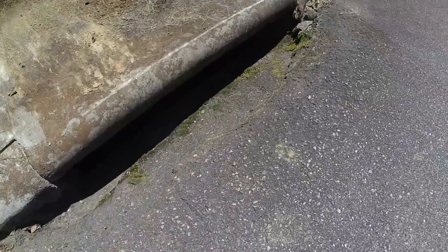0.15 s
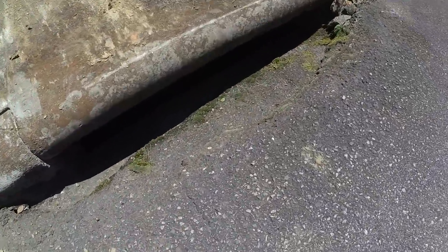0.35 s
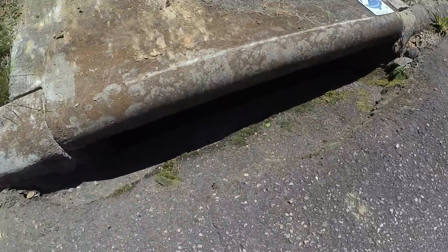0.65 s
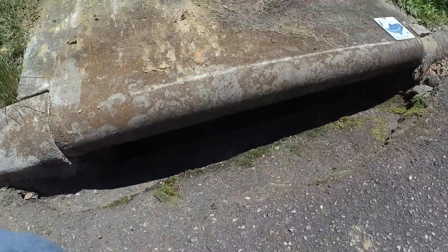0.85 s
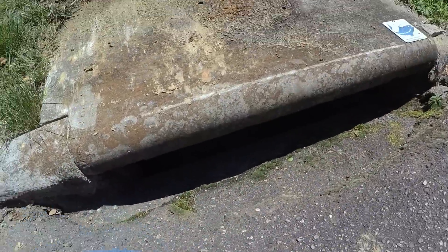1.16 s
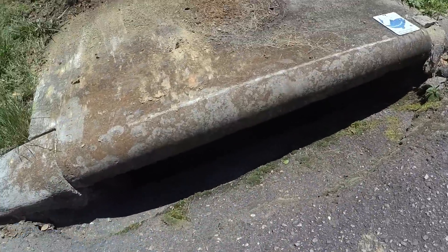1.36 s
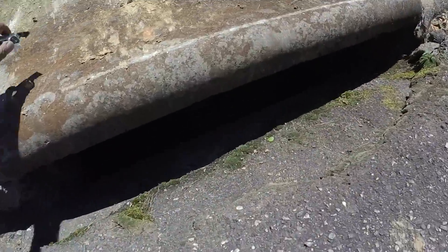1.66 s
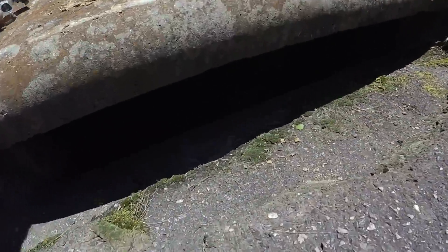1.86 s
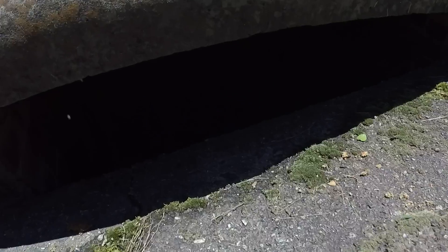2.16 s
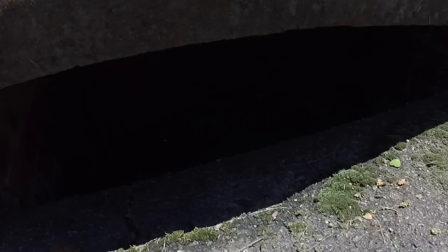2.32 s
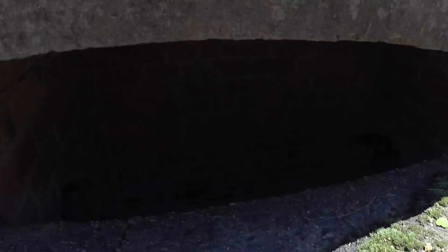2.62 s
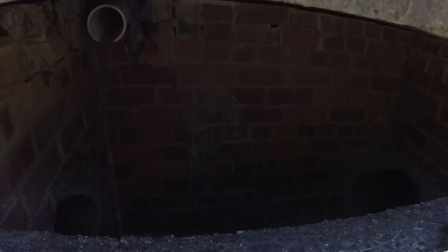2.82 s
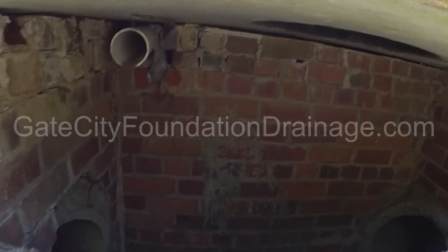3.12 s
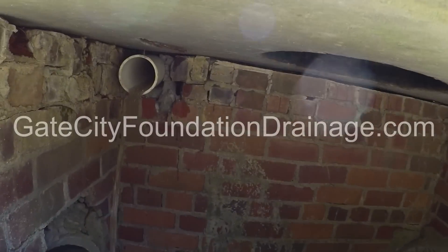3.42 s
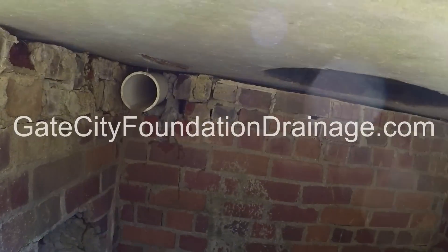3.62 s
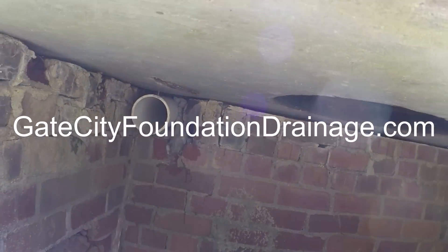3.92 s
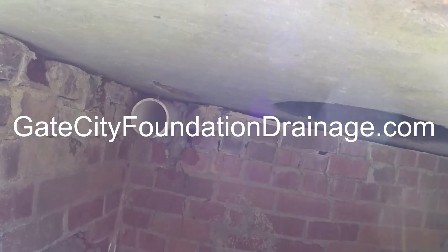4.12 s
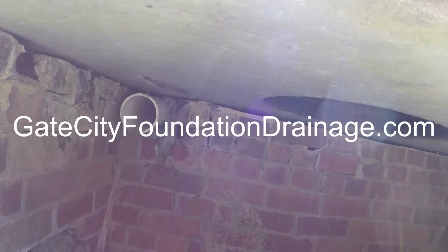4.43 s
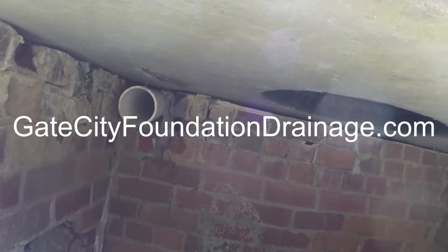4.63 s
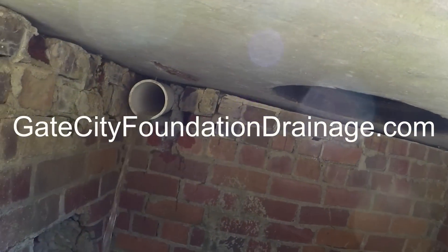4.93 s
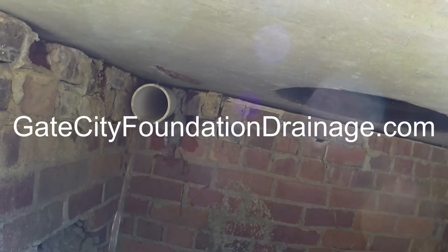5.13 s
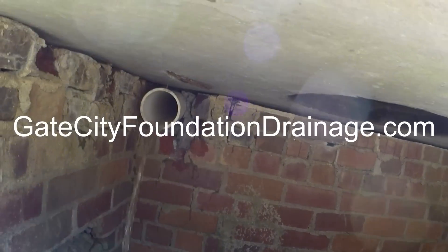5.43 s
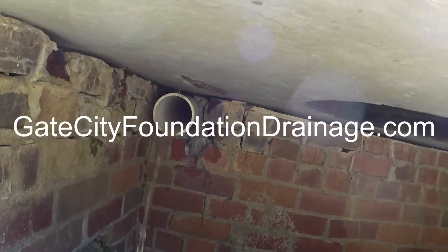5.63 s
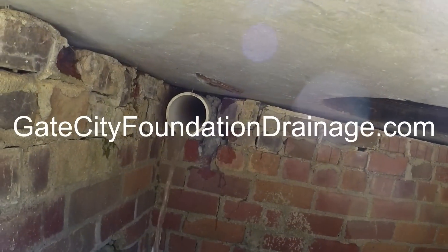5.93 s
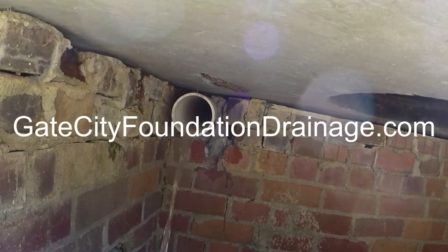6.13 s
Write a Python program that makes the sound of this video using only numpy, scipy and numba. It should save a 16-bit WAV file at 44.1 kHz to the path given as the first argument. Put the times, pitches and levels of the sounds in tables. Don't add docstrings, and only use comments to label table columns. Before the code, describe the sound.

From 0 to 2 seconds, a low, wavering street rumble lies beneath a soft, distant splatter of water, blurred by a slot at the kerb. A hard little click of the housing sounds at 0.2 s. Between about 1.2 and 2 s, fingers rub and bump the device with dull thuds and tiny scratches. At 2.05 s a bright double clack strikes concrete, followed by a small tap at 2.2 s. At once the water is nearer and fuller, ringing shortly between brick walls. A thin stream crackles irregularly on the floor, with sharp wet snaps, duller slaps, plops and brief bubbling gurgles over a steady hiss. The rumble recedes. From 3.5 s, fine misty spray brightens the sound and a faint low machine hum rises, strongest near 5.6 s. Especially strong splashes burst at 5.36 and 6.04 s, and the water continues to the end at 6.3 s.

```python
import sys
import numpy as np
from scipy import signal
from scipy.fft import rfft, irfft
from scipy.io import wavfile
from scipy.ndimage import uniform_filter1d
from numba import njit

SR = 44100
rng = np.random.default_rng(int(sys.argv[2]) if len(sys.argv) > 2 else 0)


def persist_wave(psi):
    counts = np.round(np.clip(psi, -1, 1) * 32767).astype(np.int16)
    wavfile.write(sys.argv[1], SR, np.atleast_2d(counts).T)


def nominal_scale(level):
    x = np.asarray(level, float) / 20
    return 10 ** x


N = 276507

SLOT_S, CROSSING_S, TURN_S = 2.04, 0.47, 9.6

# freq_hz, level_db (per Hz)
STREET_TONE = [(15, -42), (25, 3), (224, 3), (332, -3), (368, -4.5), (468, -7), (659, -10), (961, -9),
               (1050, -14), (1500, -13), (1950, -46), (3300, -120)]
# time_s, level_db
STREET_LEVEL = [(0.0, -50.5), (1.29, -48.5), (2.0, -49), (3.53, -54), (5.92, -52), (6.27, -55)]
# time_s, level_db
HUM_LEVEL = [
    (0, -89),
    (3.5, -56),
    (4.6, -52),
    (5.6, -46),
    (6.27, -48),
]
# freq_hz, width_hz, level_db
HUM_TONES = [(149, 5.6, -9.5), (228, 12.5, -8.5), (311.5, 8.7, -12), (373.6, 15, -7)]
# middle_s, peak_db, pitch_hz, half_length_s
HAND_THUMPS = [(0.55, -40.5, 346, 0.0077), (1.217, -40, 241, 0.0026), (1.287, -39, 108, 0.015),
               (1.306, -44, 342, 0.0034), (1.334, -33, 120, 0.0048), (1.338, -30, 318, 0.008),
               (1.347, -31, 590, 0.0032), (1.381, -36, 360, 0.0034), (1.393, -38, 300, 0.0052),
               (1.412, -37, 500, 0.0058), (1.486, -30, 87.5, 0.0047), (1.531, -35, 104, 0.015),
               (1.572, -21, 333, 0.0019), (1.862, -26.5, 174, 0.0056), (1.878, -29.5, 94.5, 0.0078),
               (1.946, -21, 164, 0.0047), (1.981, -35, 148, 0.0051), (2.781, -41, 60.4, 0.014),
               (5.952, -33, 85.5, 0.0082)]
# start_s, peak_db, centre_hz, length_s
HOUSING_RUBS = [(1.247, -30, 2400, 0.031), (1.277, -30, 2400, 0.03), (1.296, -41, 452, 0.015),
                (1.298, -31.5, 2500, 0.02), (1.314, -37, 2620, 0.012), (1.333, -39, 500, 0.0078),
                (1.366, -47, 500, 0.012), (1.391, -43, 460, 0.011), (1.402, -43, 520, 0.01),
                (1.567, -43, 560, .02), (1.651, -37.5, 630, 0.012), (2.049, -18, 3830, 0.015),
                (2.412, -44, 647, 0.017), (3.908, -40.5, 474, 0.078)]
# start_s, peak_db, pitch_hz, decay_cycles
BODY_KNOCKS = [(0.2144, -21, 4530, 3.9), (0.218, -11.5, 4100, 2.2), (0.2243, -10, 2800, 0.58),
               (0.2275, -16, 3130, 1.6), (1.464, -29, 847, 0.33), (2.0522, -13, 1170, 4.8),
               (2.053, -12, 2090, 3.7), (2.0536, -13, 5600, 5.5), (2.0724, -1.5, 4040, 0.59),
               (2.073, -5, 4760, 3.5), (2.0732, -8, 2540, 4.4), (2.0742, -4.5, 6330, 8.3),
               (2.075, -10.5, 3830, 7.3), (2.076, -16.5, 1634, 13), (2.189, -23.5, 1715, 6.1),
               (2.1891, -25, 1320, 4.6)]
# middle_s, peak_db, pitch_hz, half_length_s
SHARP_TICKS = [(0.2248, -32, 330, 0.0021), (0.225, -21.5, 960, 0.0014), (0.2258, -26, 2500, 0.00035),
               (0.2293, -22, 3600, .0003), (1.2538, -24, 2900, 0.00094), (1.296, -25, 2500, .0004),
               (1.33, -34, 2400, .0005), (1.344, -31, 600, .001), (1.392, -35, 480, .0012),
               (1.4645, -37, 900, 0.00058), (1.6355, -26, 3250, .0006), (1.9225, -25, 6000, 0.00054),
               (2.0535, -26, 750, 0.0013), (2.0729, -6, 3200, 0.00014), (2.0737, -12, 5370, .0004),
               (2.0838, -14, 3800, .0005), (2.187, -22, 2700, 0.00075), (2.1886, -18.5, 1520, .0011),
               (2.499, -21, 5650, 0.00045), (2.6827, -7, 5660, 0.00019), (2.6862, -11, 4450, 0.00025),
               (2.7705, -19, 6000, 0.00044), (3.1062, -18, 5670, .0006), (3.1255, -14, 5400, 0.00054),
               (3.8745, -21, 4500, .0004), (5.361, -13, 6200, .0005), (6.0645, -13, 2950, .001)]
# start_s, peak_db, centre_hz
STREET_SLUGS = [(0.042, -14.5, 6260), (0.139, -30, 4040), (0.205, -17.5, 4540), (0.247, -20, 6170),
                (0.32, -23.5, 2980), (0.388, -16.5, 6500), (0.454, -18, 2950), (0.518, -16.5, 5500),
                (0.575, -17, 4600), (0.638, -24.5, 2880), (0.685, -17, 4800), (0.84, -21, 5930),
                (0.932, -29, 5600), (1.116, -20, 3100), (1.164, -18.5, 3740), (1.2526, -24, 2880),
                (1.541, -18, 4930), (1.6347, -34, 3200), (1.7275, -27, 3260), (1.763, -22, 4100),
                (1.9215, -11, 6200), (2.03, -10, 6640)]
# start_s, peak_db, centre_hz
SMALL_STREET_SLUGS = [(0.2813, -30, 2980), (0.5641, -20, 3950), (0.8784, -23, 4400), (1.0146, -22, 5930),
                      (1.0844, -28, 5190), (1.413, -34, 3030), (1.4834, -28, 5110), (1.588, -25, 4840),
                      (1.8284, -26, 6450), (1.8634, -23, 2990)]
# start_s, peak_db, centre_hz
BIG_SLUGS = [(2.271, -8.5, 5630), (2.497, -8, 5700), (2.683, -5.5, 4870), (2.7674, -2, 6000),
             (2.787, -8, 4500), (2.907, -7.5, 4840), (3.0585, -6, 5770), (3.123, -6, 5200),
             (3.135, -10, 4970), (3.259, -12, 5000), (3.28, -8, 5600), (3.31, -10.5, 5300),
             (3.417, -9, 5470), (3.582, -7, 6700), (3.707, -11, 6860), (3.815, -19, 5660),
             (3.873, -4.5, 5600), (4.036, -9.5, 5600), (4.277, -7.5, 5530), (4.357, -2, 6300),
             (4.379, -10, 5150), (4.456, -8.5, 5050), (4.681, -5.5, 6100), (4.858, -7, 5970),
             (4.942, -4, 6100), (5.108, -6.5, 6100), (5.29, -6, 6100), (5.327, -4, 6350),
             (5.358, 1.5, 6100), (5.67, -2, 6100), (5.693, -9, 6800), (5.789, -14, 4900), (6.0396, 6, 6670)]
# start_s, peak_db, centre_hz
LESSER_SLUGS = [(2.1104, -14.5, 4590), (2.1854, -23, 5880), (2.2234, -20, 4640), (2.4069, -14, 5400),
                (2.4483, -11, 6240), (2.4813, -15, 5700), (2.5795, -13.5, 5260), (2.61, -14, 6830),
                (2.6424, -21, 4500), (2.7504, -16, 5990), (2.837, -9.5, 5730), (2.8838, -16, 5290),
                (2.9791, -10, 5620), (3.0214, -13, 5270), (3.1053, -13, 5680), (3.1914, -11, 4910),
                (3.2291, -26, 5170), (3.3837, -19, 5250), (3.5528, -11, 6200), (3.6064, -16, 6340),
                (3.6326, -15, 5260), (3.6526, -17, 6200), (3.6955, -20, 5460), (3.9689, -18, 5600),
                (4.1255, -19, 5640), (4.144, -21, 5100), (4.1654, -16, 6150), (4.2128, -12, 5800),
                (4.3424, -19, 5950), (4.4413, -14, 4940), (4.5351, -15, 6300), (4.5674, -18, 6180),
                (4.6129, -15, 4560), (4.7456, -17, 6490), (4.8963, -16, 6330), (4.9247, -11, 6200),
                (4.9821, -12, 5100), (5.0304, -12, 6230), (5.0853, -17, 4970), (5.1464, -19, 6500),
                (5.2465, -15, 5860), (5.4234, -13, 6380), (5.4575, -10, 6200), (5.5343, -12, 5870),
                (5.5702, -11, 5800), (5.6294, -26, 6100), (5.7404, -21, 6440), (5.8544, -31, 6000),
                (5.895, -27, 6400), (5.9334, -24, 6200), (6.0003, -24, 6040), (6.2442, -13, 6680)]
# start_s, peak_db, centre_hz
BRICK_SLAPS = [(2.184, -27, 2700), (2.216, -17, 2900), (2.375, -19, 2880), (2.45, -20.5, 2700),
               (2.494, -23, 3370), (2.608, -17, 2630), (2.679, -16, 3000), (2.769, -15, 2700),
               (2.786, -9.5, 3800), (2.975, -15.5, 3140), (3.131, -12.5, 3340), (3.1565, -12, 3100),
               (3.222, -15, 3570), (3.421, -17, 3620), (3.6865, -13, 3640), (3.8116, -15.5, 3740),
               (3.8705, -18, 2600), (4.01, -16.5, 3400), (4.2, -19, 3100), (4.373, -17.5, 3250),
               (4.497, -16, 3000), (4.855, -16, 3080), (4.951, -22, 2390), (5.079, -17, 3770),
               (5.397, -17, 3750), (5.6867, -20, 2390), (5.7919, -17, 3100), (5.9665, -19.5, 2830),
               (6.021, -19, 2640), (6.0613, -12.5, 3040)]
# start_s, peak_db, centre_hz
LESSER_SLAPS = [(2.1162, -20, 2700), (2.347, -29, 3560), (2.6667, -19.5, 2990), (2.906, -30, 3970),
                (2.9352, -14.5, 4000), (3.2565, -21, 3630), (3.2959, -21, 3260), (3.3797, -23, 2960),
                (3.513, -29, 3450), (3.63, -25, 2390), (3.7515, -23, 3700), (4.0851, -37, 3540),
                (4.797, -19, 3850), (4.9267, -26, 3740), (5.1507, -20, 3680), (5.2874, -29, 3200),
                (5.3457, -22, 3720), (5.4645, -19.5, 3760), (5.5154, -24, 3980), (5.5363, -24, 3980),
                (5.6605, -30, 2420), (5.9348, -32, 2920), (6.1489, -22, 3750)]
# start_s, peak_db, centre_hz
FLOOR_PLOPS = [(0.183, -35, 900), (2.014, -30, 1430), (2.219, -39, 1680), (2.417, -34.5, 870),
               (2.605, -44, 1760), (2.735, -34, 1530), (2.784, -25, 1850), (3.124, -27, 1750),
               (3.165, -25, 1510), (3.521, -25.5, 1040), (3.633, -28.5, 1060), (3.704, -25, 1780),
               (3.75, -29.5, 1270), (3.813, -27.5, 1360), (3.903, -32.5, 723), (4.162, -27.5, 1090),
               (4.374, -30, 1620), (4.455, -37, 650), (4.505, -28, 1360), (4.648, -22, 1245),
               (4.667, -27, 1200), (5.026, -30.5, 1030), (5.318, -27, 1780), (5.466, -26.5, 1590),
               (5.511, -32.5, 617), (5.673, -27, 1550), (5.716, -38, 1780), (6.025, -24.5, 1077),
               (6.053, -25, 1890), (6.241, -31, 1054)]
# start_s, peak_db
MIST_BURSTS = [(2.6092, -31), (3.3435, -37), (3.529, -24), (3.585, -25), (3.6524, -23), (3.7087, -24),
               (3.815, -23), (3.8714, -28), (3.9087, -20.5), (4.0369, -23), (4.3557, -22), (4.537, -23),
               (4.5717, -28), (4.6131, -28), (4.8596, -36), (4.9227, -27), (5.0824, -24), (5.2164, -29),
               (5.2657, -27), (5.3418, -18), (5.5151, -20), (5.5949, -32), (5.629, -25), (5.6593, -24),
               (5.6943, -19.5), (5.7878, -20.5), (6.041, -23), (6.1036, -23)]
# start_s, peak_db, pitch_hz
PUDDLE_GURGLES = [(2.9, -13, 3080), (3.176, -29, 1290), (3.226, -20, 3600), (3.258, -24, 2400),
                  (4.573, -17, 2440), (5, -20.5, 2460), (4.3, -19, 2300), (4.719, -22, 2330),
                  (4.754, -19.5, 2390), (4.9536, -20, 2390), (5.0714, -26, 2390), (5.469, -27, 1575),
                  (5.685, -24, 2390), (5.69, -30, 1480), (5.719, -26, 1810), (5.2, -33.5, 1500),
                  (5.742, -32, 1600), (5.795, -42, 960), (6.061, -13, 2930), (6.195, -31.5, 1610)]
# time_s, splatter_level_db, air_gap_ring_hz
NEARNESS = [(0.0, -37.5, 5800), (0.54, -36, 5700), (1.38, -37.5, 5350), (1.85, -33.5, 5700),
            (2.02, -33, 5740), (2.12, -27.5, 5730), (2.3, -29.5, 5670), (2.6, -28, 5520),
            (3.12, -26.5, 5300), (3.4, -26.5, 5600), (3.9, -26.5, 5600), (4.4, -25, 5880), (4.9, -26, 5830),
            (5.38, -24.5, 6100), (5.6, -28, 6200), (5.9, -28, 6000), (6.06, -25, 6200), (6.27, -29.5, 6200)]
# freq_hz, level_db (per Hz)
WATER_TONE = [(240, -53.5), (400, -15), (473, -16.5), (543, -11), (662, -11), (954, -17), (1060, -9),
              (1250, -12.5), (1330, -11.5), (1680, -12.5), (2730, -2.5), (4180, -1.5), (6320, 2),
              (13100, -25), (15300, -32)]
# freq_hz, width_hz, level_db
PIPE_RINGS = [(1040, 23, -26), (1360, 18, 0), (1580, 34, 1.5), (1780, 32, 3), (1925, 35, -1.5),
              (2110, 38, -3), (2390, 31, -11), (2530, 29, -18), (2700, 31, -17), (2950, 29, -11),
              (4900, 300, -13), (6200, 530, -40)]


def unit(x):
    return x / np.sqrt(np.mean(x ** 2))


def curves(table):
    s, *columns = np.transpose(table)
    return [np.interp(np.arange(N) / SR, s, c) for c in columns]


def inside(outer, inner, span_s):
    progress = (np.arange(N) / SR - SLOT_S) / span_s + .5
    return outer + (inner - outer) * np.clip(progress, 0, 1)


def db_at(spectrum, hz):
    f, db = np.transpose(spectrum)
    return np.interp(np.log(np.maximum(hz, 1)), np.log(f), db)


def colour(x, spectrum, size=2048):
    gain = nominal_scale(db_at(spectrum, np.arange(size // 2 + 1) * SR / size))
    cep = irfft(np.log(gain))
    cep = np.r_[cep[0], 2 * cep[1:size // 2], np.zeros(size // 2)]
    return signal.fftconvolve(x, irfft(np.exp(rfft(cep))))[:N]


def band(x, hz, width_hz):
    return signal.lfilter(*signal.iirpeak(hz, hz / width_hz, SR), x)


def cut(x, hz, kind):
    return signal.sosfilt(signal.butter(2, hz, kind, fs=SR, output="sos"), x)


def walk(rate_hz):
    k = int(SR / rate_hz)
    steps = np.repeat(rng.standard_normal(N // k + 1), k)
    return 0.81 * uniform_filter1d(uniform_filter1d(steps, k), k)[:N]


@njit
def grains(s, hz, cycles, size, glide, swell):
    out = np.zeros(N)
    for k in range(len(s)):
        i = int(s[k] * SR)
        life = cycles[k] * SR / hz[k]
        z = size[k] + 0j
        p = np.exp(2j * np.pi * hz[k] / SR - 1 / life)
        turn = np.exp(2j * np.pi * hz[k] * glide / life / SR)
        closed, opening = 1., np.exp(-1 / (swell * life + 1e-9))
        for j in range(max(i, 0), min(i + int(5 * life), N)):
            closed *= opening
            out[j] += z.imag * (1 - closed)
            z *= p
            p *= turn
    return out


def splats(s, db, hz, length_s, octaves, cycles, scatter_db, count, blur_s=.002):
    u = rng.random((len(s), 5, count))
    late = -np.log(1 - u[:, 0])
    pitch = hz[:, None] * 2 ** (octaves * (u[:, 1] + u[:, 3] - 1))
    pitch = np.clip(pitch, 100, .44 * SR)
    size = nominal_scale(db[:, None] + scatter_db * (2 * u[:, 2] - 2) - 0.86 * late) * pitch / hz[:, None]
    when = s[:, None] + length_s[:, None] * late + blur_s * u[:, 4]
    return grains(when.ravel(), pitch.ravel(), np.full(size.size, 1. * cycles), size.ravel(), 0.028, 0.021)


def bells(table):
    out, t = 0, np.arange(N) / SR
    for s, db, hz, half_s in table:
        turn = 2 * np.pi * hz * (t - s)
        bell = np.exp(-((t - s) / half_s) ** 2)
        out = out + nominal_scale(db) * bell * (np.sin(turn) + 0.17 * np.cos(2 * turn))
    return out


def street():
    rumble = unit(colour(rng.standard_normal(N), STREET_TONE))
    deep = cut(rumble, 90, "low")
    rumble = rumble + (nominal_scale(inside(5.5, -7, TURN_S)) - 1) * deep
    rumble = rumble * nominal_scale(curves(STREET_LEVEL)[0] + 1.5 * walk(9))
    hum = sum(nominal_scale(db) * unit(band(rng.standard_normal(N), hz, width)) for hz, width, db in HUM_TONES)
    return rumble + hum * nominal_scale(curves(HUM_LEVEL)[0])


def thumps():
    return bells(HAND_THUMPS)


def rubs():
    s, db, hz, length_s = np.transpose(HOUSING_RUBS)
    grit = splats(s, db - 3.0, hz, length_s, 0.6, 1.35, 2.4, count=140, blur_s=.008)
    return cut(grit, 200, "high")


def knocks():
    s, db, hz, cycles = np.transpose(BODY_KNOCKS)
    return cut(-grains(s, hz, cycles, nominal_scale(db), 0., 0.019), [350, 9000], "band")


def ticks():
    return bells(SHARP_TICKS)


def typed(table, length_s, octaves, cycles, trim_db, blur_s):
    s, db, hz = np.transpose(table)
    db = db + trim_db - db_at(WATER_TONE, hz)
    return splats(s, db, hz, np.full(len(s), length_s), octaves, cycles, 1.53, count=60, blur_s=blur_s)


def mists():
    s, db = np.transpose(MIST_BURSTS)
    table = np.transpose([s, db, np.full(len(s), 9240)])
    return typed(table, .008, 0.57, 1.83, trim_db=-3.5, blur_s=0.0018)


def gurgles():
    s, db, hz = np.transpose(PUDDLE_GURGLES)
    db = db - 9.5 - db_at(WATER_TONE, hz)
    return splats(s, db, hz, np.full(len(s), 0.009), 0.11, 12.4, 3.2, count=8)


def plop_bubbles():
    s, db, hz = np.transpose(FLOOR_PLOPS)
    size = nominal_scale(db - 7.5 - db_at(WATER_TONE, hz))
    return grains(s + 0.00398, hz, np.full(len(s), 6.9), size, 0.017, 0.13)


def plops():
    return typed(FLOOR_PLOPS, .015, 0.87, 2.8, trim_db=-12, blur_s=.006) + plop_bubbles()


def slaps():
    big = typed(BRICK_SLAPS, .011, 0.76, 1.92, trim_db=-8, blur_s=0.0051)
    return big + typed(LESSER_SLAPS, .011, 0.44, 3.3, trim_db=-10, blur_s=.004)


def cracks(table, trim_db):
    s, db, hz = np.transpose(table)
    size = nominal_scale(db + trim_db - db_at(WATER_TONE, hz))
    return grains(s + .002, hz, np.full(len(s), 3.2), size, 0., 0.14)


def street_slugs():
    big = typed(STREET_SLUGS, 0.0087, 0.59, 0.91, trim_db=-6, blur_s=0.0064)
    small = typed(SMALL_STREET_SLUGS, .009, 0.48, 2.4, trim_db=-11, blur_s=.004)
    return big + small + cracks(STREET_SLUGS, -22.5)


def slugs():
    big = typed(BIG_SLUGS, .007, 0.69, 2.93, trim_db=-14.0, blur_s=.003)
    small = typed(LESSER_SLUGS, .01, 0.34, 4.7, trim_db=-14.5, blur_s=0.003)
    return big + small + cracks(BIG_SLUGS, -9.5)


def scattered(count, lo_hz, hi_hz, spread_db, length_s):
    u = rng.random((count, 4)).T
    hz = lo_hz * (hi_hz / lo_hz) ** u[1]
    db = 20 * np.log10(hz) + spread_db * u[2] ** 2
    return u[0] * (N - 1) / SR, db, hz, length_s * (.5 + u[3])


def splatter(ring_hz, ring_db):
    fine = scattered(9000, lo_hz=500, hi_hz=15400, spread_db=-6.0, length_s=.0035)
    spray = splats(*fine, 1.29, 1.95, 2.6, count=4)
    coarse = scattered(1100, lo_hz=500, hi_hz=10800, spread_db=8.0, length_s=.011)
    patter = splats(*coarse, 0.39, 4.8, 4.6, count=30)
    s, db, _, length_s = scattered(500, lo_hz=6000, hi_hz=6100, spread_db=3.0, length_s=.01)
    ring = splats(s, db, ring_hz[(s * SR).astype(int)], length_s, 0.16, 7.6, 9.0, count=12)
    s, db, hz, _ = scattered(2500, lo_hz=904, hi_hz=7070, spread_db=13.0, length_s=1)
    bubbles = grains(s, hz, np.full(len(s), 9.), nominal_scale(db), 0.0563, 1.0)
    hiss = rng.standard_normal(N)
    gulps = (rng.random(N) < 45 / SR) * rng.random(N)
    ragged = 1 + 0.66 * signal.lfilter([1], [1, -np.exp(-1 / (0.011 * SR))], gulps)
    bed = nominal_scale(-7.5) * unit(spray) + nominal_scale(-9.0) * unit(patter) + nominal_scale(-3.5) * hiss
    bed = bed + nominal_scale(-15.5) * unit(bubbles) + nominal_scale(ring_db - 10.5) * unit(ring)
    return ragged * bed


def stream():
    near_db, ring_hz = curves(NEARNESS)
    bass_db = inside(-22, -2, CROSSING_S) + 4.2 * walk(5.11)
    treble_db = inside(-2.5, 8.5, TURN_S)
    bed = unit(colour(splatter(ring_hz, inside(-16, -4.5, CROSSING_S)), WATER_TONE))
    low, high = cut(bed, 1800, "low"), cut(bed, 8500, "high")
    bed = bed + (nominal_scale(bass_db) - 1) * low + (nominal_scale(treble_db) - 1) * high
    return nominal_scale(near_db - 3.0) * bed


def water():
    singles = mists() + gurgles() + plops() + slaps() + street_slugs() + slugs()
    return stream() + colour(singles, WATER_TONE)


@njit
def walls(x, lags, stretch, gain, damp):
    line, soft, out = np.zeros((8, 2048)), np.zeros(8), np.zeros(len(x))
    for i in range(len(x)):
        total = 0.
        for k in range(8):
            place = i + 2048 - lags[k] * stretch[i]
            j = int(place)
            echo = line[k, j & 2047] + (place - j) * (line[k, (j + 1) & 2047] - line[k, j & 2047])
            soft[k] += (1 - damp) * (gain[k] * echo - soft[k])
            total += soft[k]
            out[i] += soft[k] * (1 - 2 * (k % 2))
        for k in range(8):
            line[k, i & 2047] = x[i] + soft[k] - total / 4
    return out


def basin(x):
    lags = np.array([131., 187., 241., 307., 379., 463., 571., 683.])
    t60_s = 0.21
    rings = sum(nominal_scale(db) * band(x, hz, width) for hz, width, db in PIPE_RINGS)
    echoes = walls(x + 1e-18, lags, 1 + 0.014 * walk(.8), nominal_scale(-60 * lags / SR / t60_s), 0.078)
    return x + nominal_scale(-3.5) * rings + nominal_scale(-20) * echoes


def scene():
    handling = thumps() + rubs()
    return (street() + handling + basin(knocks() + ticks() + water()))[None]


def band_limit(x):
    return signal.sosfilt(signal.butter(12, 15440, fs=SR, output="sos"), x)


def record(dry):
    limited = np.tanh(dry * 0.52) / 0.53
    top = signal.ellip(8, .2, 80, 15120, fs=SR, output="sos")
    return band_limit(signal.sosfilt(top, limited))


dry = scene()
out = record(dry)
persist_wave(out)
```